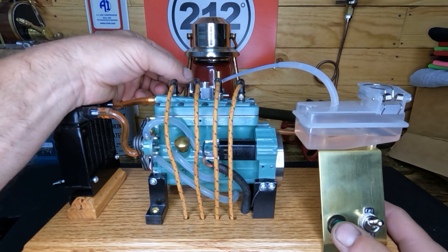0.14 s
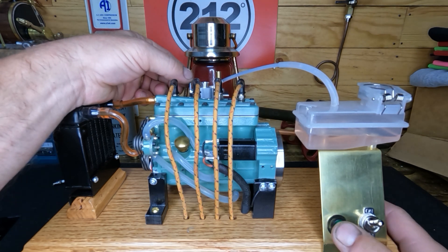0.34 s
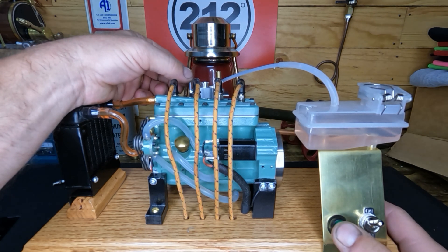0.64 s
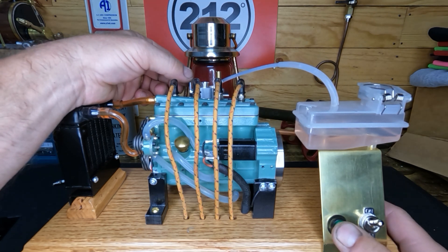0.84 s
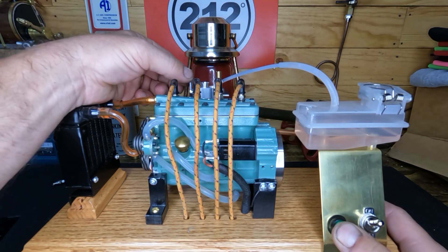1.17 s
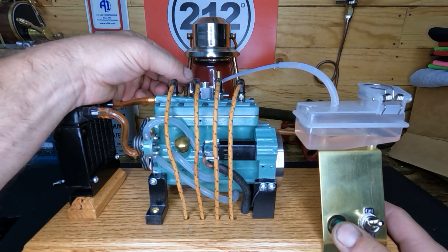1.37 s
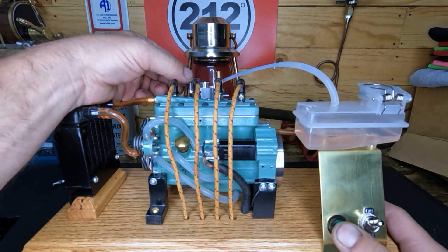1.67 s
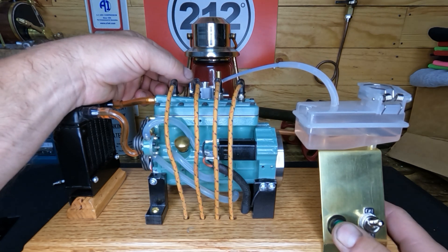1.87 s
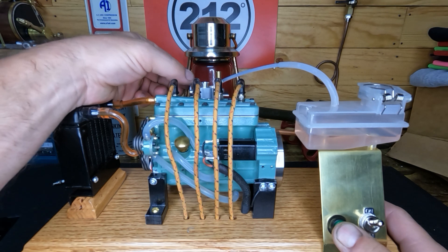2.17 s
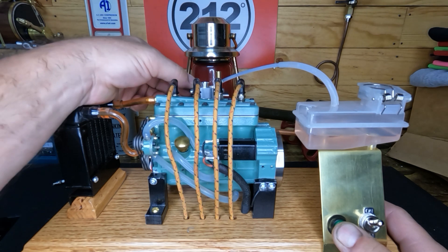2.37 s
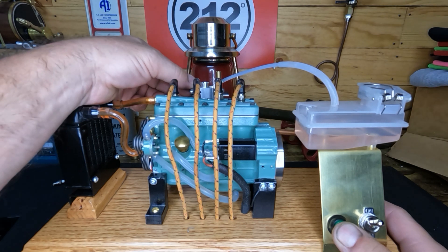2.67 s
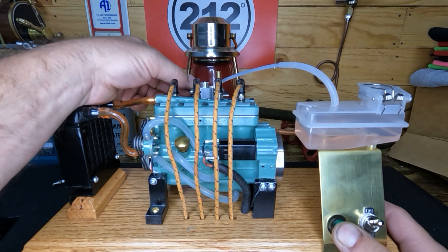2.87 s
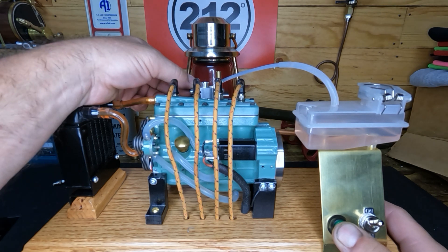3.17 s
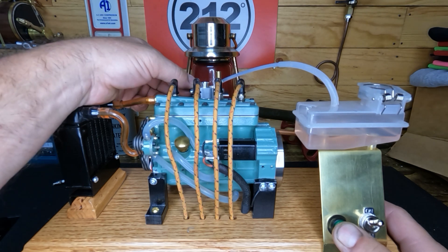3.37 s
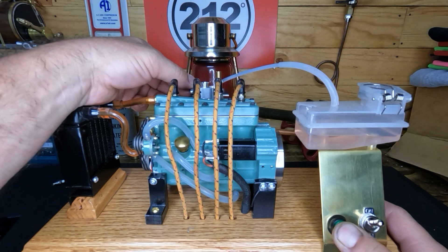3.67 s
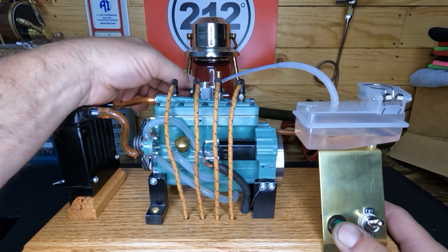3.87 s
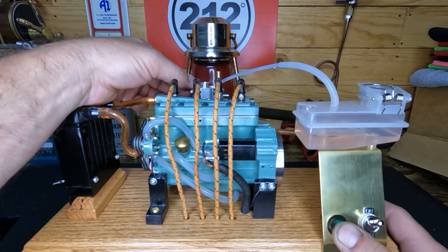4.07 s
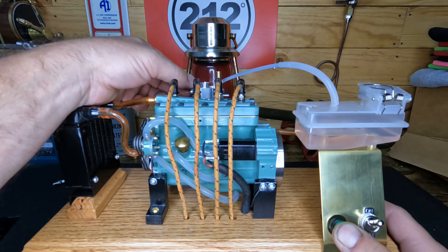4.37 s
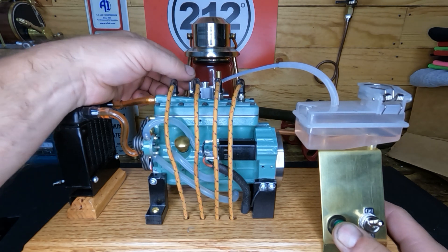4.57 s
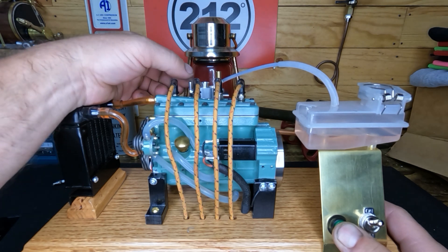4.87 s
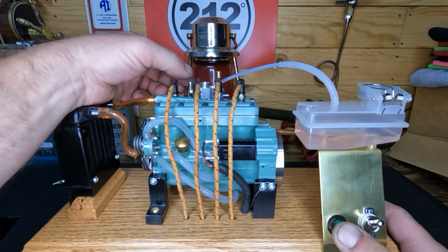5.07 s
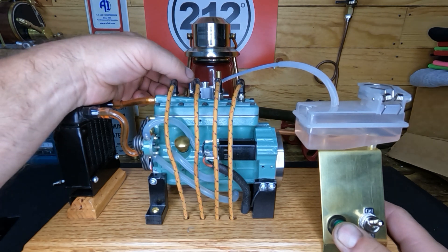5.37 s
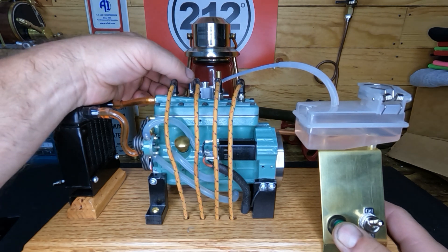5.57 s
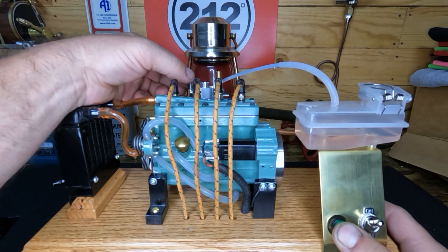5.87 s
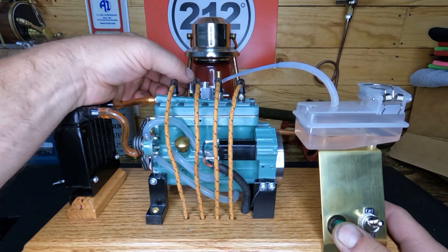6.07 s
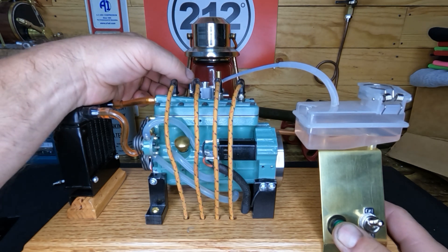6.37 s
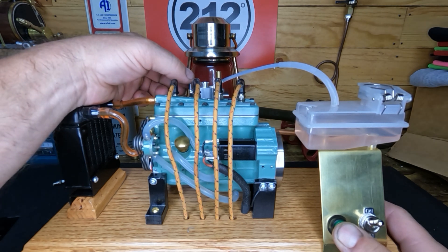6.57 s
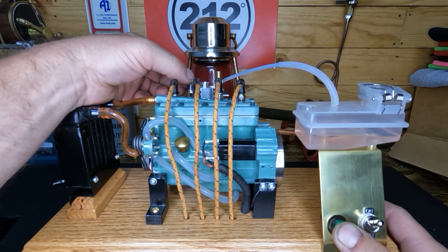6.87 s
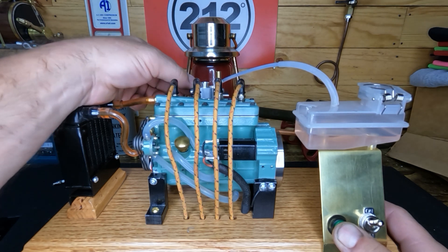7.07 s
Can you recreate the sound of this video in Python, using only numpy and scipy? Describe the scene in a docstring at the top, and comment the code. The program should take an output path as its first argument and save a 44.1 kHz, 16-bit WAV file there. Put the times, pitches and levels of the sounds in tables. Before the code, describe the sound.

Close by in a small workshop, a miniature four-cylinder engine is turned over by its electric starter. A brief jolting whirr comes first, then a tiny pause and one long crank. The gears rattle and whine, dipping in pitch with each compression, while valves tick and the pumping strokes thump lightly. The cranking slows slightly toward the end, and the engine does not catch.

```python
"""Cranking a model engine

An electric starter turns a small four-cylinder engine on a wooden board in a workshop: a short tap,
then a long crank. It never fires. Each compression loads the motor, so the gear whine swoops in a
lopsided, repeating figure. Tooth impacts excite the resonances of the block, the pumping strokes
thump the board, and the valves tick."""
import sys
import numpy as np
from scipy import signal
from scipy.fft import rfft, irfft, next_fast_len
from scipy.io import wavfile
from scipy.ndimage import uniform_filter1d

SR = 44100
rng = np.random.default_rng(int(sys.argv[2]) if len(sys.argv) > 2 else 0)


def pcm_store(signal):
    """Save signal as 16-bit PCM."""
    levels = np.round(np.clip(np.atleast_2d(signal), -1, 1) * 32767)
    wavfile.write(sys.argv[1], SR, levels.astype(np.int16).T)


N = 318843
TIME = np.arange(N) / SR
NORMAL_PACE = 7.3  # crank turns per second at speed 1

# Force spectrum of a tooth impact. Each row: frequency in Hz, level in dB.
IMPACT_SPECTRUM = [(100, -20), (380, -5), (700, -8.5), (1100, -4), (1600, -14.5), (2300, 0), (3800, -1),
                   (6000, 0), (10000, -0.5), (15000, -1)]


def undb(db):
    """Amplitude ratio of a level in decibels."""
    return 10 ** (np.asarray(db) / 20)


def unit(x):
    """Normalisation to an rms of 1."""
    return x / np.sqrt(np.mean(x ** 2))


def add(out, start_s, x):
    """Superposition of x on out from start_s."""
    i = max(int(start_s * SR), 0)
    out[i:i + len(x)] += x[:max(N - i, 0)]


def chance(size):
    """Uniform draws between -1 and 1."""
    return 2 * rng.random(size) - 1


def wander(rate_hz):
    """Bounded random modulation with an rms of 1."""
    return unit(np.interp(TIME * rate_hz, np.arange(N), chance(N)))


def bell(x, rise, fall):
    """Gaussian hump of height 1 at x = 0, with a width for each side."""
    return np.exp(-np.square(x / np.where(x < 0, rise, fall)))


def colour(x, points):
    """Zero-phase filtering by a spectrum of (Hz, dB) points."""
    hz, db = np.transpose(points)
    size = 2 * next_fast_len(N)
    f = np.maximum(np.fft.rfftfreq(size, 1 / SR), 1)
    gain = undb(np.interp(np.log(f), np.log(hz), db))
    return irfft(rfft(x, size) * gain)[:N]


def resonate(x, hz, width_hz):
    """Two equal resonators in cascade, each of bandwidth width_hz."""
    b, a = signal.iirpeak(hz, hz / width_hz, fs=SR)
    return signal.lfilter(b, a, signal.lfilter(b, a, x))


def block_ring(size=4096):
    """Minimum-phase impulse response of the block, whose modes add in power."""
    # Modes of the block and gear housing. Each row: frequency in Hz, width in Hz, level in dB.
    modes = [(377, 34, -1.5), (442, 164, -11), (640, 153, -4.5), (848, 63, -5), (1014, 48, -7.5),
             (1196, 236, -5.5), (1574, 175, -7), (1862, 204, -6.5), (2412, 440, -6.5), (2589, 62, -3),
             (3175, 234, -4.5), (3490, 64, -3.5), (3922, 420, -3.5), (4337, 58, -3.5), (4570, 590, -8.5),
             (4873, 210, -3.5), (5394, 460, -0.76), (5620, 79, 3), (6010, 172, 1.54), (6352, 203, -1.5),
             (6895, 500, -9), (7610, 190, -12.5), (8300, 1050, -18.5), (9086, 760, -12),
             (10060, 570, -19.5), (11400, 2160, -24), (14200, 1500, -49)]
    f = np.fft.rfftfreq(size, 1 / SR)
    power = sum(undb(db) ** 2 / (1 + 2 * ((f - hz) / width) ** 2) ** 2 for hz, width, db in modes)
    cepstrum = irfft(np.log(power) / 2)
    fold = 1 + np.sign(size / 2 - np.arange(size))  # makes the response causal
    fold[0] = 1
    return irfft(np.exp(rfft(cepstrum * fold)))


def through_block(force):
    """Forced vibration: the force is convolved with the block's impulse response."""
    return signal.fftconvolve(force, block_ring())[:N]


def crank_times(turns, point):
    """Moments at which the crank passes a given phase of its two-turn cycle."""
    return TIME[1:][np.diff((turns - point) // 2) > 0]


def reflections(t60_s, gap_s):
    """Diffuse echoes: exponentially decaying noise of energy 1."""
    t = np.arange(SR // 2) / SR
    tail = rng.standard_normal(len(t)) * np.exp(-np.log(1000) * t / t60_s) * (t > gap_s)
    return tail / np.linalg.norm(tail)


def workshop(x, room_db=-14, noise_db=-54, hum_hz=122, hum_db=-52):
    """Reverberation over a faint hum: wooden walls scatter sound differently to left and right."""
    # Background noise of the room. Each row: frequency in Hz, relative level in dB.
    noise_spectrum = [(18, -47), (30, -16), (86, 10.5), (123, -23.5), (172, 0), (373, -38), (1380, -18),
                      (1700, -42), (2630, -17.5), (3320, -35), (5410, -17), (7950, -40), (14000, -62)]
    # Share of the sound that differs between the sides. Each row: frequency in Hz, level in dB.
    spread = [(60, -28), (200, -19), (380, -17), (700, -9), (1300, -16.5), (2500, -4.5), (4400, -9.5),
              (6200, -18.5), (8500, -3.5), (14000, -2.5)]
    mid = x + undb(room_db) * signal.fftconvolve(x, reflections(t60_s=0.25, gap_s=0.00504))[:N]
    mid += undb(noise_db) * unit(colour(rng.standard_normal(N), noise_spectrum))
    mid += undb(hum_db) * np.sin(2 * np.pi * hum_hz * TIME)
    scattered = signal.fftconvolve(mid, reflections(t60_s=0.13, gap_s=.001))[:N]
    side = colour(scattered, spread) + .3 * np.gradient(mid)  # sound reaches the left slightly sooner
    return np.array([mid + side, mid - side])


def ticks(turns, valve_db=-24, uneven_db=4, click_db=-2, chatter_s=.0012, chatter=0.14):
    """Impulse excitation: valves, switch and gear backlash strike the metal and chatter briefly."""
    # Clicks of the switch and the backlash. Each row: start in seconds, relative level in dB.
    clicks = [(0.117, -22), (.123, -20), (0.14, -10), (0.6346, 1), (1.5046, -2), (2.6225, 0), (3.785, -11),
              (4.5596, 4), (4.6088, -9), (5.9551, -6), (5.9736, 2), (6.2748, -9), (6.9238, -4)]
    t = np.arange(SR // 50) / SR
    closings = np.r_[crank_times(turns, .055), crank_times(turns, 1.025)]  # a valve shuts once a turn
    snaps = [(at, valve_db + uneven_db * draw) for at, draw in zip(closings, chance(64))]
    force = np.zeros(N)
    for at, db in [(at, db + click_db) for at, db in clicks] + snaps:
        blow = (t == 0) / 2 + chatter * chance(len(t)) * np.exp(-t / chatter_s)
        add(force, at, undb(db) * blow)
    return through_block(colour(force, IMPACT_SPECTRUM)) / np.abs(block_ring()).max()


def knock(hz, rise_s, glide=0.):
    """Damped oscillation after a soft blow: it swells for rise_s, then dies away."""
    t = np.arange(SR // 4) / SR
    swell = ((t / rise_s) * np.exp(1 - t / rise_s)) ** 2
    return swell * np.sin(2 * np.pi * (hz * t * (1 + glide * t / 2) + rng.random()))


def strokes(turns, drive_db, board_db=-36, case_db=-37, rumble_db=-5, rise_s=0.012):
    """Structure-borne sound: each pumping stroke rings the case and thumps the board, which rumbles."""
    # Strokes of the cycle. Each row: phase in turns, active from and until in seconds,
    # thump pitch in Hz and relative level in dB, case pitch in Hz and relative level in dB.
    pumping = [(.04, 2.5, 5.6, 125.3, 2.5, 366.6, 0.5), (.15, 0, 7.3, 119.3, 6, 374.4, 8),
               (.3, 0.24, 7.3, 109, -4, 356.5, 2.5), (.66, 0, 7.3, 118.4, 7.5, 380, 2.5),
               (.93, 2.5, 4.5, 150, 8, 366.6, 0), (.95, 0, 7.3, 200, -5.5, 367, 5.5),
               (1.082, 0, 7.3, 120, 0.5, 437, 6), (1.14, 2.5, 3.2, 125, 11, 370, -1),
               (1.19, 0.5, 7.3, 125, 1.5, 367, 4), (1.71, 0.26, 7.3, 113, 9, 375, -1),
               (1.8, 0.8, 4.9, 154.3, 6, 364, 1)]
    # Jolts as the starter takes up and drops its load. Each row: start in seconds, relative level in dB.
    jolts = [(0.173, 18), (.205, 15.5), (.27, 14), (.352, 15), (.432, 14), (0.461, 10), (0.941, 12)]
    board, case = np.zeros(N), np.zeros(N)
    for point, start, until, thump_hz, thump_db, ring_hz, ring_db in pumping:
        for at, draws in zip(crank_times(turns, point), chance((32, 4))):
            if start < at < until:
                thump_jitter, thump_detune, ring_jitter, ring_detune = draws
                load_db = np.interp(at, TIME, drive_db)
                hz = thump_hz * np.exp(0.11 * thump_detune)
                thump = knock(hz, rise_s, glide=4) + undb(-12) * knock(2 * hz, rise_s * 0.75)
                ring = knock(ring_hz * (1 + 0.047 * ring_detune), rise_s)
                add(board, at, undb(load_db + thump_db + 3 * thump_jitter) * thump)
                add(case, at, undb(load_db + ring_db + 4.5 * ring_jitter) * ring)
    for at, db in jolts:
        add(case, at, undb(db) * knock(hz=389 * (1 + 0.074 * chance(1)), rise_s=0.0085))
        add(board, at, undb(db - 14) * knock(hz=105, rise_s=rise_s))
    shake = uniform_filter1d(np.abs(board), SR // 10)
    rumble = unit(resonate(rng.standard_normal(N), hz=79, width_hz=100)) * shake
    return undb(board_db) * (board + undb(rumble_db) * rumble) + undb(case_db) * case


def squeal(whistle_db):
    """Narrow-band noise: free-running gears set one housing resonance hissing."""
    force = rng.standard_normal(N) * undb(whistle_db)
    return unit(through_block(resonate(force, hz=3830, width_hz=520)))


def growl(speed, rough_db=2):
    """A motor's torque rises as it slows, so below normal speed it shakes the case's resonance."""
    force = rng.standard_normal(N) * undb(rough_db * wander(45)) * np.maximum(1 - speed, 0)
    return unit(resonate(force, hz=385, width_hz=110))


def grinding(grind_db, rough_db=3):
    """Friction noise: gears loaded by compression excite the housing's middle resonances."""
    force = rng.standard_normal(N) * undb(grind_db + rough_db * wander(200))
    return unit(through_block(resonate(force, hz=1350, width_hz=750)))


def clatter(mesh_hz, clatter_db, speed, hits_per_tooth=4, rub=0.91, patchy_db=2.04, surge_db=0.93):
    """Shot noise: loose teeth strike at random, more often at speed, over the rub of their flanks."""
    hits = (rng.random(N) < hits_per_tooth * mesh_hz / SR) * chance(N)
    force = unit(hits) + rub * rng.standard_normal(N)
    force *= undb(clatter_db + patchy_db * wander(300) + surge_db * wander(60))
    hardness = np.minimum(speed, 1)  # slow teeth stay in contact longer and sound duller
    force = hardness * force + (1 - hardness) * uniform_filter1d(force, size=3)
    return unit(through_block(colour(force, IMPACT_SPECTRUM)))


def whine(mesh_hz, whine_db, octave_db, whistle_db, speed, flutter=0.00982, rough_db=2.5):
    """Periodic tooth contact makes tones that follow shaft speed; loaded teeth add the octave."""
    # Tones of the unloaded reduction gears. Each row: multiple of the mesh rate, relative level in dB.
    free_tones = [(2.3, -9), (3.92, -4), (4.08, -14.5)]

    def tone(multiple, db, shake):
        """Uneven teeth modulate frequency and amplitude."""
        hz = multiple * mesh_hz * (1 + shake * wander(350))
        return undb(db + rough_db * wander(220)) * np.sin(2 * np.pi * np.cumsum(hz) / SR)

    unsteady = flutter + .25 * np.maximum(1 - speed, 0)  # a labouring motor runs unevenly
    mesh = tone(0.98, whine_db, unsteady) + tone(2, octave_db, unsteady)
    whistle = sum(tone(multiple, whistle_db + db, shake=0.01488) for multiple, db in free_tones)
    return unit(through_block(mesh + whistle))


def compressions(turns):
    """Cyclic loading: the gears whistle when free, then whine and grind as each cylinder slows them."""
    # Compressions. Each row: beginning, top and release in turns; mesh rate at normal speed before and
    # at the top in Hz; relative levels of whine, octave, grinding, clatter change and whistle in dB.
    cylinders = [(.47, .68, .88, 1034, 654.6, 11, 9.5, -8.5, 0, 9),
                 (.92, 1.1, 1.4, 1142, 640, 8, 10, 2, -4, -8),
                 (1.54, 1.74, 1.88, 926, 760.1, 6, 1.5, -10.5, 1, 11),
                 (1.92, 2.125, 2.33, 1121, 629.3, 8, 10.5, 0.5, -2, -8)]
    begin, top, free, fast_hz, slow_hz, *levels = np.transpose(cylinders)
    whine_db, octave_db, grind_db, dip_db, whistle_db = levels
    cycle = np.linspace(0, 2, 400, endpoint=False)

    def humps(peak, rise, fall):
        """One hump per cylinder: peak is 0 at its beginning and 1 at its top; widths are in turns."""
        offset = (cycle[:, None] - begin - peak * (top - begin) + 1) % 2 - 1
        return bell(offset, rise, fall)

    def swell(db, peak, rise, fall, floor_db):
        """Level in dB of the humps summed in amplitude over a floor."""
        return 20 * np.log10(humps(peak, rise, fall) @ undb(db) + undb(floor_db))

    # the mesh eases down to each top, then up to the rate at which it meets the next cylinder
    corners = np.sort(np.r_[np.c_[begin, top, free].ravel(), begin[0] + 2])
    corner_hz = np.r_[np.c_[fast_hz, slow_hz, np.roll(fast_hz, -1)].ravel(), fast_hz[0]]
    index = np.arange(len(corners))
    leg = np.interp((cycle - begin[0]) % 2 + begin[0], corners, index)
    eased = leg // 1 + np.sin(np.pi / 2 * (leg % 1)) ** 2
    controls = (np.interp(eased, index, corner_hz),
                swell(whine_db, peak=.1, rise=.065, fall=.095, floor_db=-26),
                swell(octave_db, peak=.7, rise=.05, fall=.075, floor_db=-24),
                swell(grind_db, peak=.67, rise=.16, fall=.52, floor_db=-26),
                humps(peak=1.47, rise=.07, fall=.07) @ dip_db,
                swell(whistle_db, peak=-.33, rise=.07, fall=.095, floor_db=-17))
    return [np.interp(turns, cycle, control, period=2) for control in controls]


def crank_angle(speed, cycle_start_s=.761):
    """Turns are the integral of pace, which goes as speed squared: a slow motor lingers on each load."""
    turns = np.cumsum(NORMAL_PACE * speed ** 2) / SR
    return turns - np.interp(cycle_start_s, TIME, turns)


def starter(kick=.5, bite_s=.015, coast_s=.04, fade_s=0.049, fade_db=-67):
    """Rotor inertia: speed and level rise exponentially at each press and decay on release."""
    # Presses of the button. Each row: on, off and spin-up time in seconds, relative top speed,
    # relative level at first contact in dB.
    presses = [(.138, .437, .14, 1.15, -16), (.607, 7.5, .022, 1, -37)]
    # The motor falters. Each row: centre and half length in seconds, share of speed lost, change in dB.
    stumbles = [(0.241, .024, .38, -19), (.368, 0.01303, .15, -1.5), (0.958, .015, 0.01984, -2.5),
                (5.576, .02, .01, -2.5), (6.689, .018, .13, -3.5)]
    # Pace of steady cranking. Each row: time in seconds, crank turns per second.
    pace = [(0.7, 5.823), (1.15, 6.952), (1.6, 7.332), (2.4, 7.523), (2.6, 7.95), (3.1, 8.28), (3.3, 7.333),
            (4.1, 7.229), (4.45, 7.369), (5.5, 7.074), (5.85, 7.372), (6.4, 6.903), (6.7, 6.732),
            (7.23, 6.565)]
    speed, gain = np.zeros(N), np.full(N, 1e-6)
    for on, off, spin_up_s, top, contact_db in presses:
        held, freed = np.maximum(TIME - on, 0), np.maximum(TIME - off, 0)
        spin_up = 1 - (1 - kick) * np.exp(-held / spin_up_s)  # the share kick is reached at once
        speed += (TIME > on) * top * spin_up * np.exp(-freed / coast_s)
        level_db = contact_db * np.exp(-held / bite_s) + fade_db * (1 - np.exp(-freed / fade_s))
        gain += (TIME > on) * undb(level_db)
    drive_db = 20 * np.log10(gain)
    for at, half_s, lost, db in stumbles:
        dip = bell(TIME - at, half_s, half_s)
        speed *= 1 - lost * dip
        drive_db += db * dip
    speed *= np.sqrt(np.interp(TIME, *np.transpose(pace)) / NORMAL_PACE)
    return speed, drive_db


def scene(uneven_db=1.5, uneven_hz=30.62):
    """Superposition: gears, strokes and valves follow one crank angle and sound in one room."""
    speed, drive_db = starter()
    turns = crank_angle(speed)
    mesh_hz, whine_db, octave_db, grind_db, clatter_db, whistle_db = compressions(turns)
    speed = np.maximum(speed, .3)  # below this the gears sound no duller
    mesh_hz *= speed
    whine_db += uneven_db * wander(uneven_hz)  # no two compressions bite alike
    octave_db += uneven_db * wander(uneven_hz)
    # slow gears grind more than they sing
    gears = undb(-30) * whine(mesh_hz, whine_db, octave_db, whistle_db, speed) * speed
    gears += undb(-33.5) * growl(speed)
    gears += undb(-31.5) * grinding(grind_db) / speed ** 2.2
    gears += undb(-22) * clatter(mesh_hz, clatter_db, speed) * speed ** 0.37
    gears += undb(-40) * squeal(whistle_db)
    return workshop(gears * undb(drive_db) + strokes(turns, drive_db) + ticks(turns))


def record(dry, ceiling=0.32, top_hz=15600):
    """Soft saturation rounds the highest peaks, and a low-pass filter cuts the top."""
    rounded = dry / (1 + (dry / ceiling) ** 4) ** (1 / 4)
    return signal.sosfilt(signal.ellip(10, .2, 80, top_hz, fs=SR, output="sos"), rounded)


dry = scene()
out = record(dry)
pcm_store(out)
```